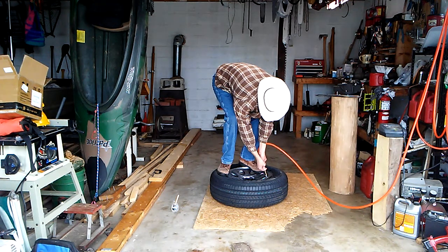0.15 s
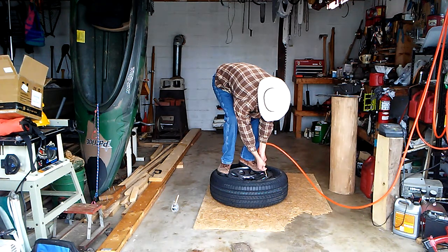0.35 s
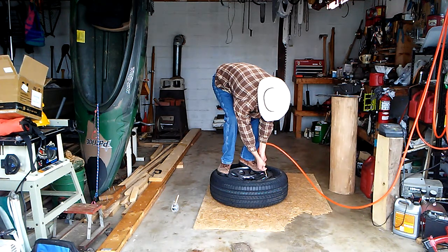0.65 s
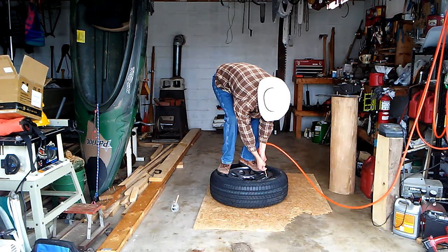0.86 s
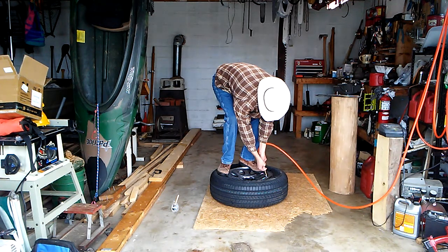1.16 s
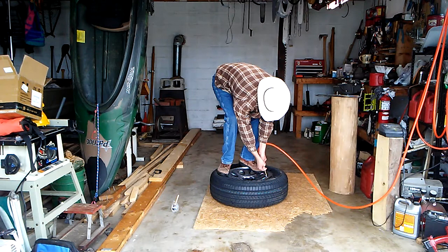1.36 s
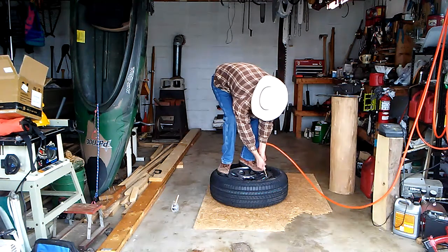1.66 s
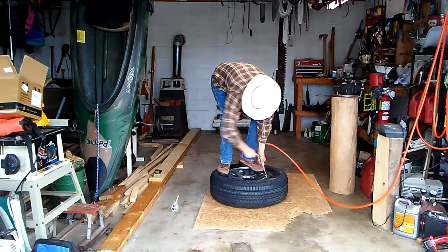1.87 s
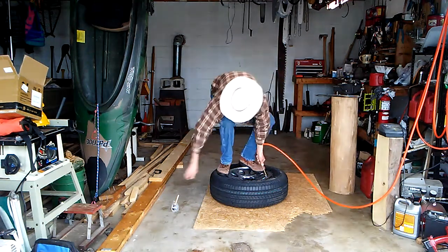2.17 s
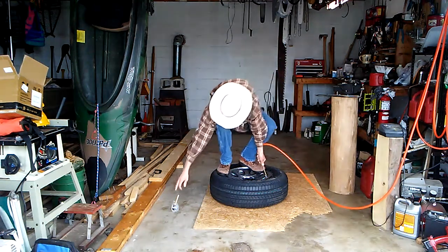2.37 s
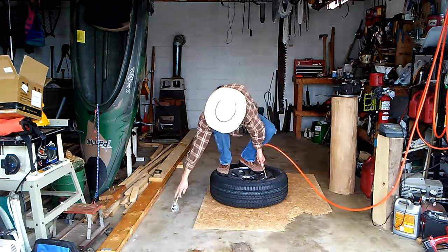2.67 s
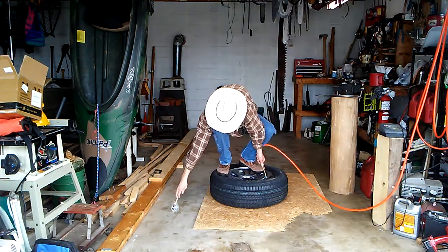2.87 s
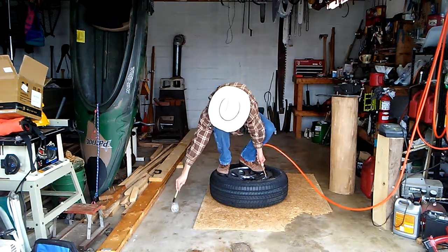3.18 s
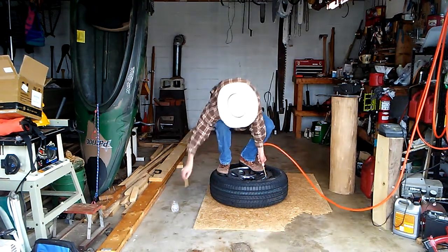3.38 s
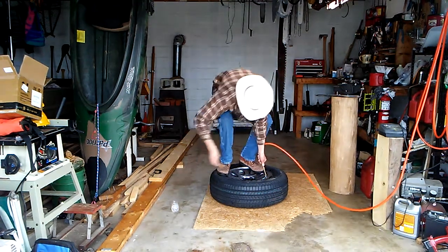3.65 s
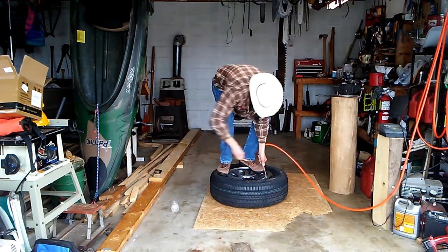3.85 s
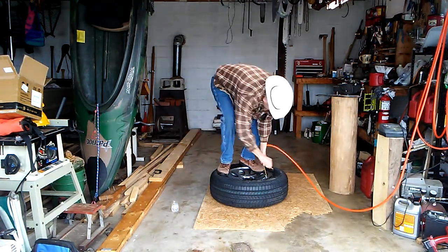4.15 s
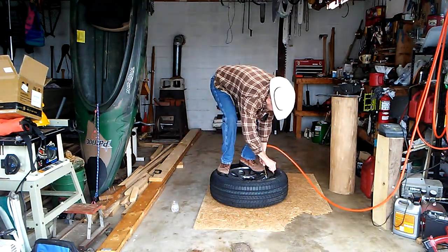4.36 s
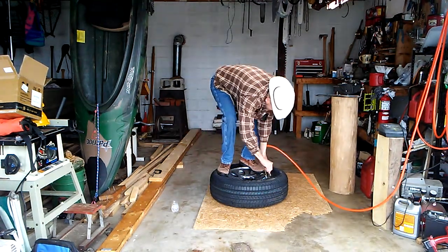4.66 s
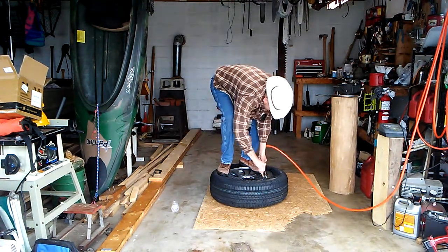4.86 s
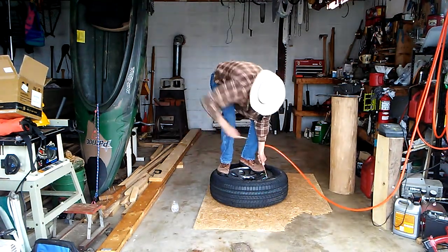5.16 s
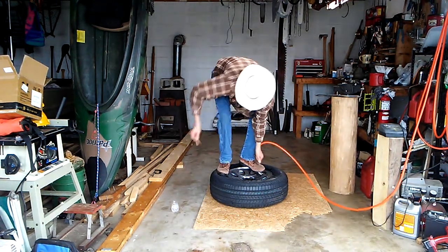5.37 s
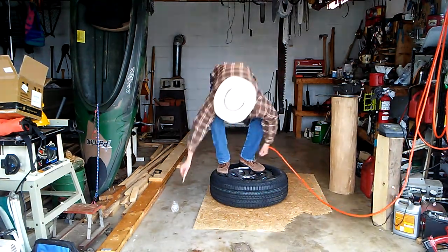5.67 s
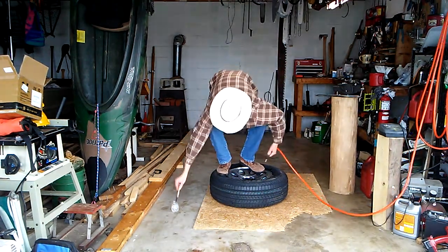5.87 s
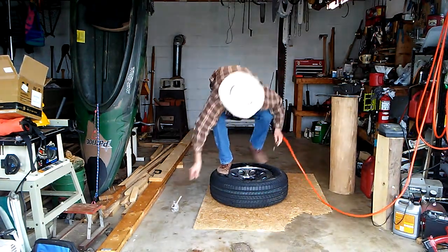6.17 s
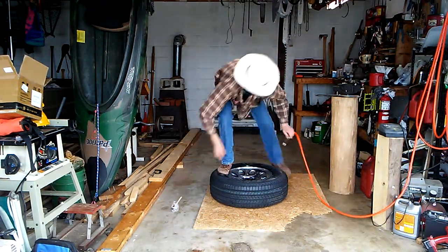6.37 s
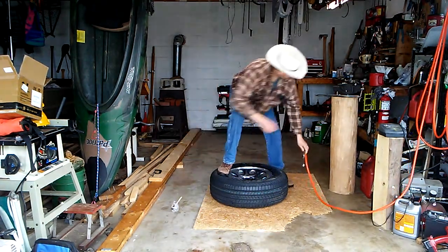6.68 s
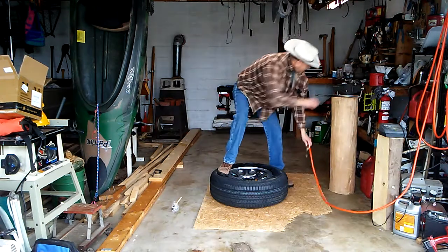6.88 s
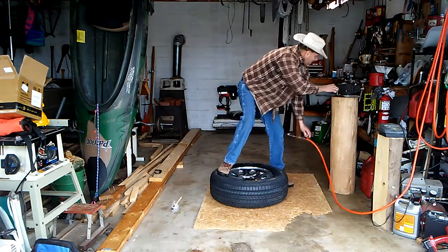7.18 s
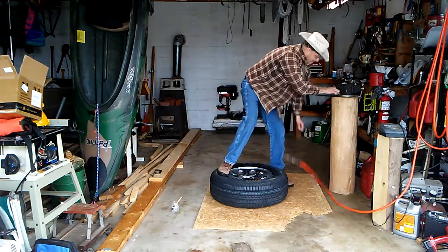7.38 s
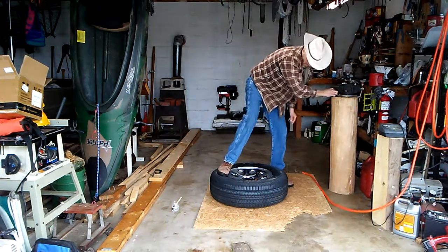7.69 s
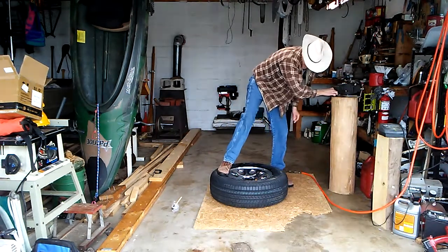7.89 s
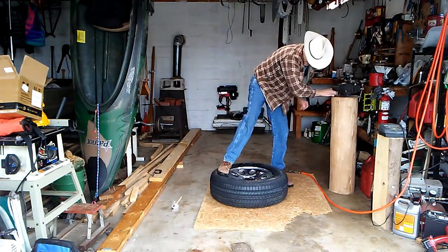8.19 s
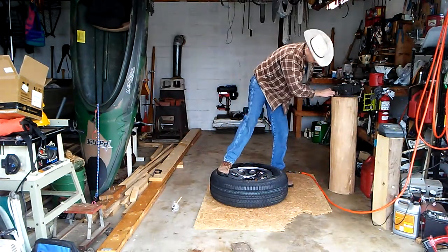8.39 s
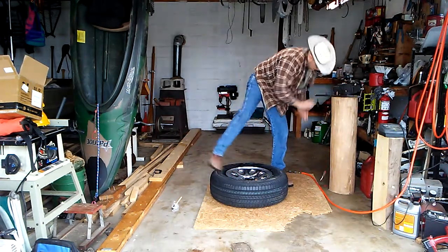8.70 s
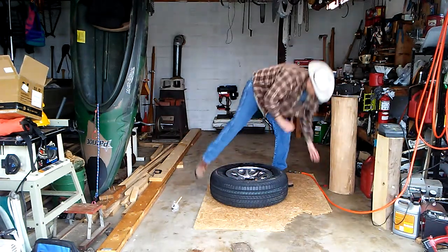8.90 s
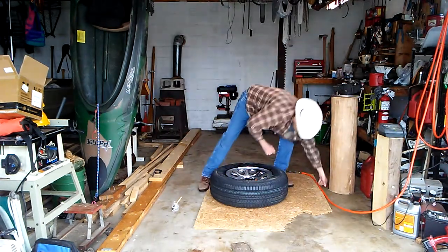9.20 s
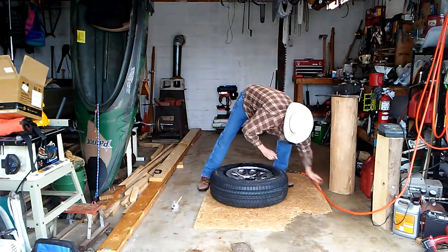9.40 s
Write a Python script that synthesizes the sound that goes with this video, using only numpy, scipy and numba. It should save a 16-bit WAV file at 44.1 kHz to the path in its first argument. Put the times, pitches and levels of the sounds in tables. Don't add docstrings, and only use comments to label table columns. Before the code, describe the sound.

Steady buzzing, rattling compressor with airy hiss; a leaking jet at a tyre, one cracking, shuddering thud, and later a few small ringing taps.

```python
import sys
import numpy as np
from scipy import signal
from scipy.fft import rfft, irfft
from scipy.io import wavfile
from scipy.ndimage import uniform_filter1d, minimum_filter1d
from numba import njit

SR = 44100
rng = np.random.default_rng(int(sys.argv[2]) if len(sys.argv) > 2 else 0)


def dump(signal):
    limited = np.clip(np.atleast_2d(signal).T, -1, 1)
    pcm = np.round(limited * 32767).astype(np.int16)
    wavfile.write(sys.argv[1], SR, pcm)


def amplitude_ratio(level_db):
    exponent = np.asarray(level_db, float) / 20
    return 10 ** exponent


N = 420710

# time_s, turn_rate_hz
SHAFT_SPEED = [(0.0, 27.303), (1.5, 27.283), (3.3, 27.23), (5.6, 27.216), (7.0, 27.231), (8.2, 27.213),
               (8.8, 27.233), (9.54, 27.233)]
# multiple_of_turn_rate
# (rounded to whole multiples), level_db
PUMP_TONES = [(2, -45), (4, -53), (6, -40.5), (8, -40), (9, -55), (10, -38.5), (12, -58), (13, -32),
              (14, -26), (16, -34), (17, -38), (18, -55), (19, -40.5), (20, -34), (22, -28.5), (24, -28),
              (25, -68), (26, -28), (28, -31), (30, -47.5), (32, -35.5), (34, -30), (36, -46.5),
              (40, -38),
              (42, -40.5), (44, -40.5), (46, -29.5), (48, -35), (50, -38.5), (54, -35.5), (56, -37),
               (65.88, -32), (67.8, -32), (70, -35.5), (72, -33.5), (82, -49), (79.5, -35), (94.4, -38.5),
               (96.3, -54), (104, -46), (106.2, -58), (107.9, -31.5), (115.3, -48), (118.3, -38.5),
               (120.7, -52), (126, -38), (131.6, -45), (133.4, -42.5), (140, -40.5), (143.7, -35),
               (146.1, -46), (153, -42), (89.9, -37.5),
              (214, -56), (230, -56)]
# multiple_of_pump_turn_rate, level_db
MOTOR_TONES = [(3.384, -59.5), (4.508, -65), (5.632, -52), (6.756, -39.5), (7.139, -47.5), (7.88, -53.5),
               (9.016, -46.5), (10.14, -55), (12.4, -38), (13.4, -72), (147.3, -37)]
# multiple_of_turn_rate, top_s, lift_db, half_length_s
ECHO_SHIFTS = [
    (104, 1, 19.5, 1.1),
    (108, .5, 1, 1.3),
    (142, 1.2, 6, 2.8),
    (26, 3, -4, .8),
    (68, 6.3, 6, 1.9),
    (66, 4.9, 5.5, 1.9),
    (32, 8.25, 9.5, 0.53),
    (94, 8.3, 9.5, 0.81),
    (68, 7.4, -1, 0.77),
    (34, 8.5, -2, 1.2),
]
# frequency_hz, level_db (per Hz)
RATTLE_COLOUR = [(30, -41), (60, -24), (110, -46), (150, -16.5), (230, -14), (340, 1), (480, -6.5),
                 (700, -2), (1050, -10.5), (1450, -8.5), (2100, -3.5), (3200, -6), (4000, -8), (16000, -39)]
# frequency_hz, width_hz, lift_db
CASING_MODES = [(327, 140, 0.5), (703, 33, -6), (903, 145, 6), (1040, 34, 2.5), (1620, 240, 4),
                (1900, 310, 2.5), (2132, 38, 6.5), (2448, 84, 7), (2701, 16, 9), (2915, 120, 3.5),
                (3758, 69, 9.5), (4020, 31, 7), (5900, 200, 7.5), (9200, 150, 4)]
# frequency_hz, level_db (per Hz)
HISS_COLOUR = [(4300, -14), (5000, -14), (5500, -19), (6040, -10), (6700, -0.5), (9300, -1.5),
               (11800, -7.5), (13600, -30), (15600, -45)]
# start_s, rush_db, pinch_db
HOSE_JERKS = [
    (0.0, 1, 5),
    (0.13, 3, -0.5),
    (0.41, 3, 0),
    (0.615, 4, -4.5),
    (1.36, 4.5, 1),
    (6.305, 5, -5),
    (7.14, 1.5, 0),
    (7.81, 3, 3),
    (8.36, 8, -2),
    (9.495, 1, -0.5),
]
# top_s, lift_db, half_length_s, treble_share_change_db
HOSE_SWELLS = [(0.302, 1.5, .04, 0), (1.0, 3, .14, -1.5), (1.82, 2.5, 0.09, -1), (2.33, 3.5, 0.12, -3),
               (3.0, 2.5, .25, 1), (5.722, 2.2, .05, 5), (6.002, 4.5, .2, 6.5), (6.4, -0.7, .8, 2.5),
               (6.74, 5.5, 0.06, 0), (7.0, -0.5, .12, 4), (7.56, 3.5, .13, -3), (8.22, 1, .1, -1),
               (8.44, .6, .06, 4), (8.602, 5, .07, 2), (9.2, 2, .25, -.6)]
# time_s, level_db
LEAK_LEVEL = [
    (3.1, -42),
    (3.17, -22.5),
    (3.54, -24.5),
    (3.85, -23),
    (4.44, -30),
    (5.3, -27),
    (5.42, -31.5),
    (5.65, -44),
]
# frequency_hz, level_db (per Hz)
LEAK_COLOUR = [(3060, -57), (5200, -20), (5730, -13.5), (6510, -3.5), (8190, 1), (11200, -6), (15600, -35)]
# top_s, lift_db, fall_s
CHUCK_SPURTS = [
    (3.272, 5.5, 0.056),
    (4.485, 4, .05),
    (4.98, 6.5, .06),
    (5.252, 13.5, 0.031),
]
# frequency_hz, width_hz, level_db
TYRE_MODES = [(202, 69, -3.5), (332, 140, 2.5), (440, 99, 0), (574, 160, 3), (875, 270, -7),
              (1520, 490, -9.5), (2460, 1700, -17.5)]
# time_s, level_db
REBOUNDS = [
    (5.12, -12),
    (5.19, -23),
]
# start_s, treble_db, centre_hz, thud_db, decay_s
TOOL_TAPS = [
    (7.531, -22, 8250, -9, 0.44),
    (7.809, -25, 8340, -40, 0.36),
    (8.368, -27, 8900, -40, .3),
    (8.551, -39, 11800, -60, .035),
]
# frequency_hz, gain_db
MICROPHONE_PORT = [(20, -1), (4030, 0), (4080, -6.5), (4270, -11.5), (4360, -29), (4700, -23), (5000, -7),
                   (5300, -5), (5600, 1), (22000, 6.5)]


def frequencies():
    return np.fft.rfftfreq(N, 1 / SR)


def curve(rows, before=None, after=None):
    time_s, value = np.transpose(rows)
    return np.interp(np.arange(N) / SR, time_s, value, before, after)


def slope(points):
    hz, db = np.transpose(points)
    return amplitude_ratio(np.interp(np.log(frequencies() + 1), np.log(hz), db))


def humps(modes):
    f = frequencies()
    return [(1 / (1 + (2 * (f - hz) / width) ** 2), db) for hz, width, db in modes]


def noise(gain):
    x = irfft(rfft(rng.standard_normal(N)) * gain, N)
    return x / np.std(x)


def walk(rate):
    knots = rng.standard_normal(int(N / SR * rate) + 2)
    wander = np.interp(np.arange(N) * rate / SR, np.arange(len(knots)), knots)
    return uniform_filter1d(wander, int(SR / rate / 2))


def bump(top_s, rise_s, fall_s):
    age = np.arange(N) / SR - top_s
    return np.exp(np.where(age < 0, age / rise_s, -age / fall_s))


@njit
def partials(turn, order, gain, start, sway, drift):
    out = np.zeros(len(turn))
    for k in range(len(order)):
        for i in range(len(turn)):
            at = i * (sway.shape[1] - 1) / len(turn)
            j = int(at)
            part = at - j
            level = sway[k, j] + part * (sway[k, j + 1] - sway[k, j])
            shift = drift[k, j] + part * (drift[k, j + 1] - drift[k, j])
            out[i] += gain[k] * level * np.sin(2 * np.pi * order[k] * turn[i] + start[k] + shift)
    return out


def drone(turn, order, db, sway_db, top_sway_db, slip, spread, count=40):
    high = np.clip(order / 60, 0, 1)[:, None]
    chance = rng.standard_normal((2, len(order), count))
    sway = amplitude_ratio((sway_db + top_sway_db * high) * chance[0])
    sway = sway / np.sqrt(np.mean(sway ** 2, axis=1, keepdims=True))
    t = np.linspace(0, N / SR, count)
    moved_db = np.zeros((len(order), count))
    for multiple, top_s, lift_db, half_s in ECHO_SHIFTS:
        swell_db = lift_db * np.exp(-((t - top_s) / half_s) ** 2)
        moved_db += np.outer(order == np.round(multiple), swell_db)
    gain = np.sqrt(2) * amplitude_ratio(db)
    start = spread * order ** 2
    return partials(turn, order, gain, start, sway * amplitude_ratio(moved_db), slip * high * chance[1])


def compressor():
    turn = np.cumsum(curve(SHAFT_SPEED)) / SR
    order, db = np.transpose(PUMP_TONES)
    order = np.round(order)
    pump = drone(turn, order, db, sway_db=0.4, top_sway_db=1.6, slip=0.25, spread=1.12)
    motor_order, motor_db = np.transpose(MOTOR_TONES)
    motor = drone(turn, motor_order, motor_db, sway_db=4.5, top_sway_db=-5, slip=0.6, spread=0.9)

    rest = np.setdiff1d(np.arange(21, 223), order).astype(float)
    rest_db = -49 - 6 * (rest % 2) - 19 * (rest > 170) + 3.5 * rng.standard_normal(len(rest))
    faint = drone(turn, rest, rest_db, sway_db=1.5, top_sway_db=2, slip=0.8, spread=0.37, count=30)

    casing = amplitude_ratio(sum(db * shape for shape, db in humps(CASING_MODES)))
    ripple = uniform_filter1d(rng.standard_normal(N // 2 + 1), size=150) * np.sqrt(150)
    treble_loss_db = 24.5 * np.clip((frequencies() - 4300) / 700, 0, 1)
    room = amplitude_ratio(1.66 * ripple - treble_loss_db)

    stroke = 1 + 0.08 * np.cos(4 * np.pi * turn)
    stroke += 0.019 * np.cos(2 * np.pi * turn) + 0.035 * np.cos(8 * np.pi * turn)
    rattle_level = amplitude_ratio(-16.5 + 0.86 * walk(4.9))
    rattle = rattle_level * stroke * noise(slope(RATTLE_COLOUR) * casing * room)
    return pump + motor + faint + rattle + stroke * intake(casing)


def intake(casing):
    lift_db, bright_db = rustle()
    colour = slope(HISS_COLOUR) * casing
    top_share = np.clip((frequencies() - 9000) / 3500, 0, 1)
    top_db = -14 + bright_db + 0.64 * walk(15)
    body = noise(colour * np.sqrt(1 - top_share))
    top = noise(colour * np.sqrt(top_share))
    return amplitude_ratio(-36.5 + lift_db + 0.5 * walk(32)) * (body + amplitude_ratio(top_db) * top)


def rustle():
    t = np.arange(N) / SR
    pinch_s, rush_rise_s, rush_fall_s = 0.2, 0.0097, 0.13
    jerks_db, swells_db, treble_db = np.zeros(N), np.zeros(N), np.zeros(N)
    for start_s, rush_db, pinch_db in HOSE_JERKS:
        jerks_db += rush_db * bump(start_s + rush_rise_s, rush_rise_s / 2, rush_fall_s)
        jerks_db += pinch_db * bump(start_s, pinch_s, rush_rise_s / 2)
    for top_s, lift_db, half_s, share_db in HOSE_SWELLS:
        swell = np.exp(-((t - top_s) / half_s) ** 2)
        swells_db += lift_db * swell
        treble_db += share_db * swell
    return jerks_db + swells_db, -0.2 * jerks_db + treble_db


def leak():
    level_db = curve(LEAK_LEVEL, -90, -90)
    for top_s, lift_db, fall_s in CHUCK_SPURTS:
        level_db = level_db + lift_db * bump(top_s, 0.019, fall_s)
    spectrum = rfft(noise(slope(LEAK_COLOUR)))
    jet = irfft(spectrum, N)
    top = irfft(spectrum * np.clip((frequencies() - 9000) / 4000, 0, 1), N)
    brightness = amplitude_ratio(0.35 * (level_db + 24))
    return amplitude_ratio(level_db + 0.62 * walk(40)) * (jet + (brightness - 1) * top)


def tyre_noise():
    f = frequencies()
    power = sum(amplitude_ratio(2 * db) * shape ** 2 for shape, db in humps(TYRE_MODES))
    radiation = f ** 2 / (f ** 2 + 135 ** 2)
    return noise(np.sqrt(power) * radiation)


def bead():
    snap_s, attack_s = 4.965, 0.0055
    t, f = np.arange(N) / SR, frequencies()
    age = np.maximum(t - snap_s, 0)
    rise = np.minimum(age / attack_s, 1)

    shudder = amplitude_ratio(-5.5 - 28 * age - 60 * np.maximum(age - 0.122, 0) / 0.05)
    garage_tail = amplitude_ratio(-11 - 60 * age / 0.75)
    rebounds = sum(amplitude_ratio(db) * np.exp(-((t - s) / 0.008) ** 2) for s, db in REBOUNDS)
    thud = (shudder + garage_tail + rebounds) * amplitude_ratio(0.93 * walk(70)) * tyre_noise()
    air_thump = amplitude_ratio(-24 - 60 * age / 0.16) * np.sin(2 * np.pi * 62 * age)

    crack_late_s = 0.003
    crack_level = (age > crack_late_s) * amplitude_ratio(-10 - 60 * (age - crack_late_s) / 0.055)
    crack = crack_level * noise(np.exp(-((f - 2500) / 8000) ** 2))
    return rise * (thud + air_thump) + crack


def taps():
    out, t, f = np.zeros(N), np.arange(N) / SR, frequencies()
    wood = noise(np.exp(-(np.log((f + 1) / 600) / 0.6) ** 2))
    tick = noise(np.exp(-((f - 9200) / 3000) ** 2) * (f > 5000))
    for start_s, treble_db, centre_hz, thud_db, decay_s in TOOL_TAPS:
        age = np.maximum(t - start_s, 0)
        rise = np.minimum(age / 0.002, 1)
        bright = noise(np.exp(-((f - centre_hz) / (0.31 * centre_hz)) ** 2))
        treble = bright * amplitude_ratio(-60 * age / decay_s) + tick * amplitude_ratio(-9 - 60 * age / 0.03)
        thud = amplitude_ratio(thud_db - 60 * age / 0.16) * wood
        out += rise * (amplitude_ratio(treble_db) * treble + thud)
    return out


def scene():
    mono = compressor() + leak() + bead() + taps()
    return np.array([mono, mono])


def band_limit(x):
    return signal.sosfilt(signal.butter(12, 15710, fs=SR, output="sos"), x)


def record(dry):
    heard = irfft(rfft(dry) * slope(MICROPHONE_PORT), N)
    peak = uniform_filter1d(-minimum_filter1d(-np.abs(heard), size=300), size=300)
    limited = heard * np.minimum(1, 0.82 / peak) ** 0.6
    mix = np.clip(limited, -0.96, 0.96)
    return band_limit(mix)


dry = scene()
out = record(dry)
dump(out)
```